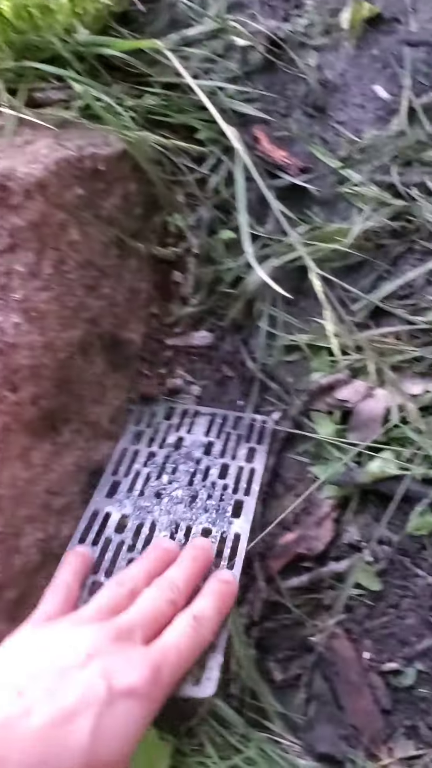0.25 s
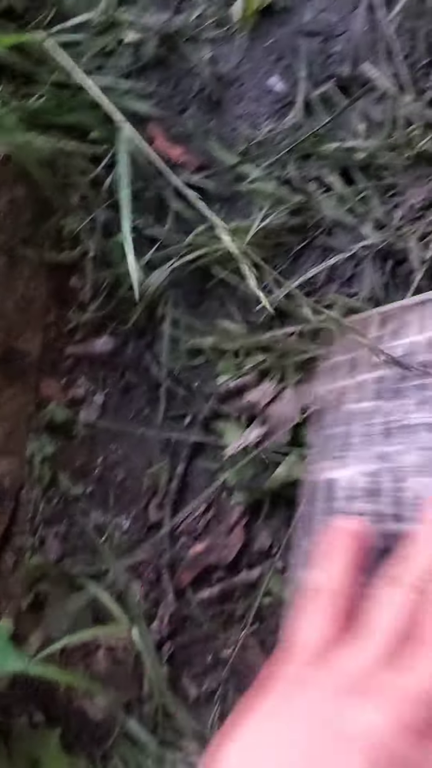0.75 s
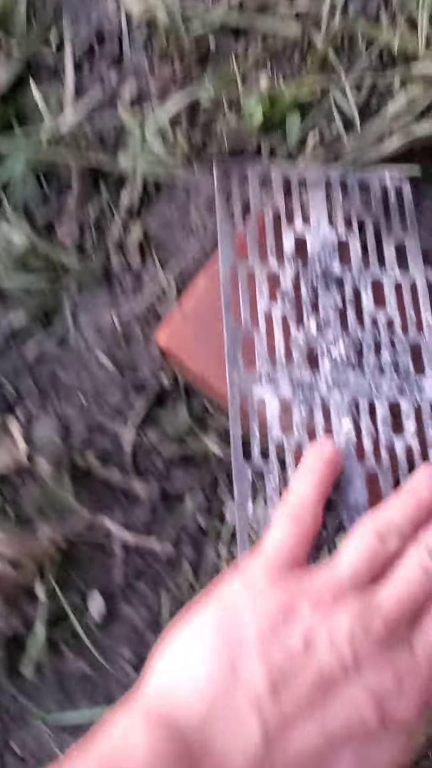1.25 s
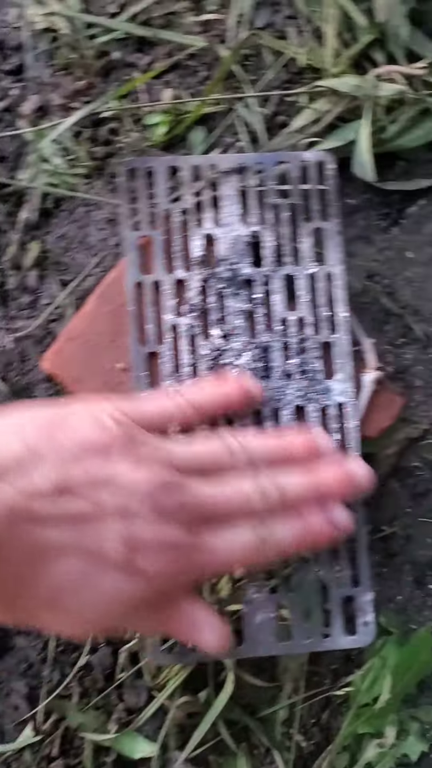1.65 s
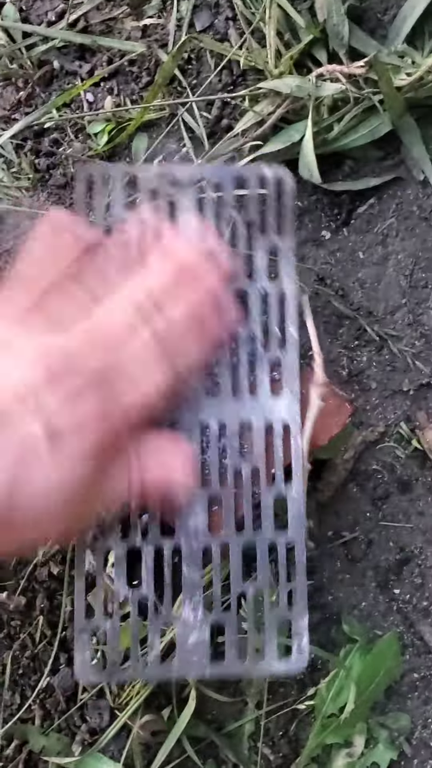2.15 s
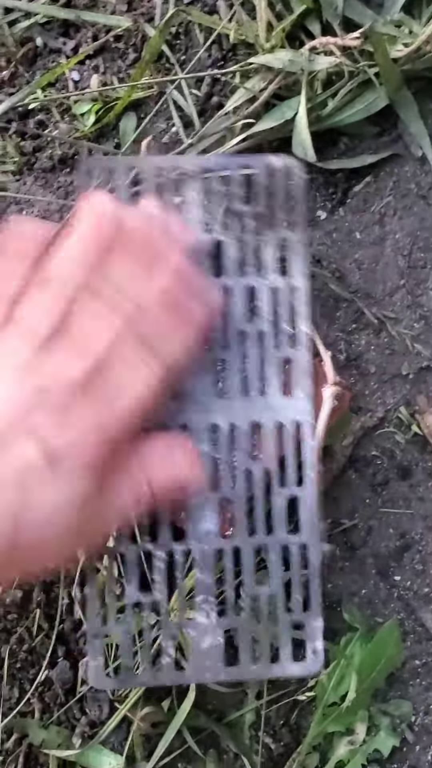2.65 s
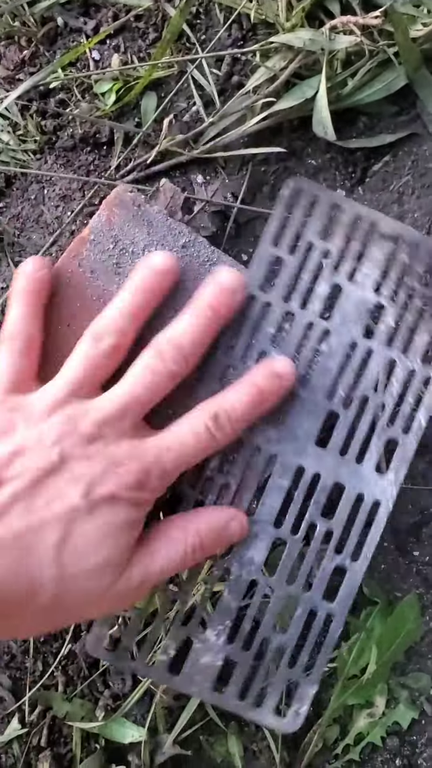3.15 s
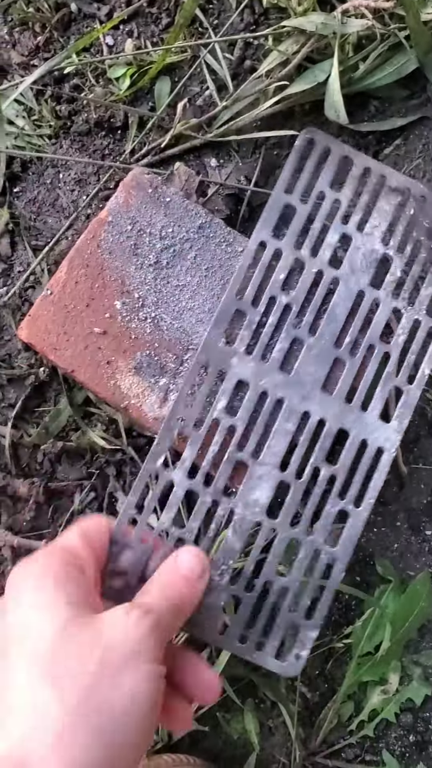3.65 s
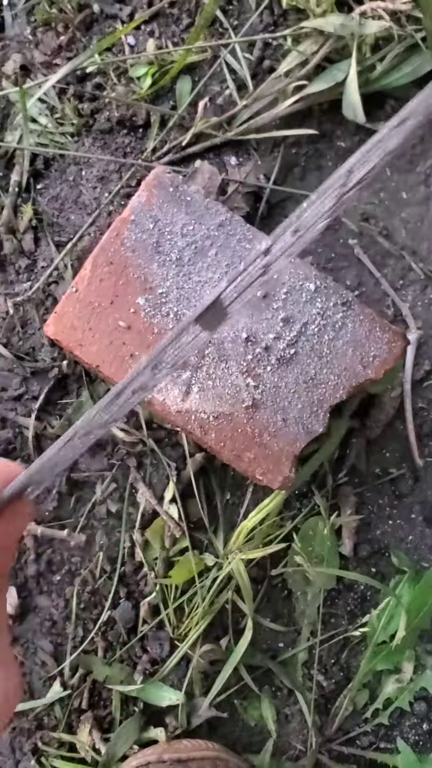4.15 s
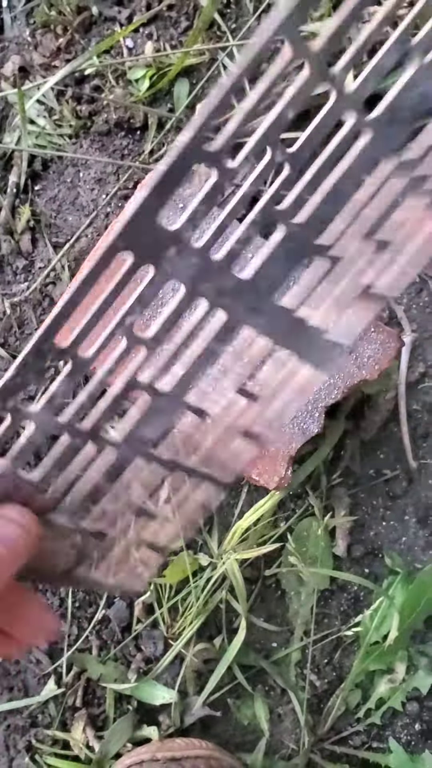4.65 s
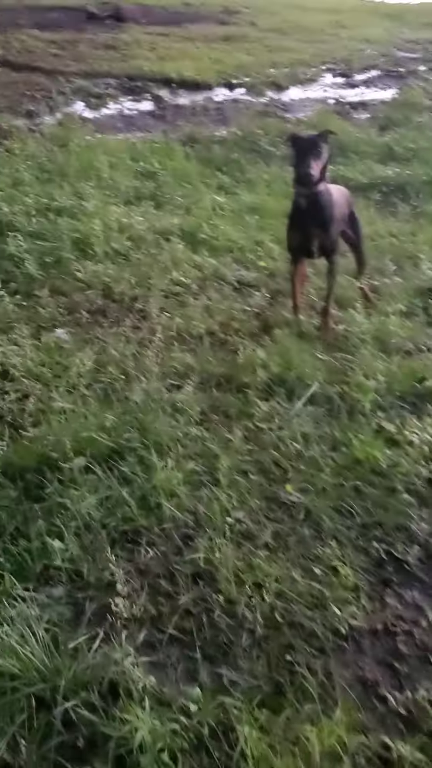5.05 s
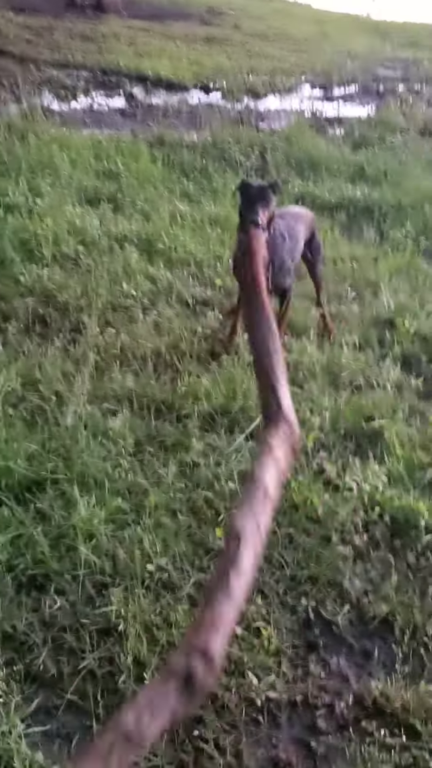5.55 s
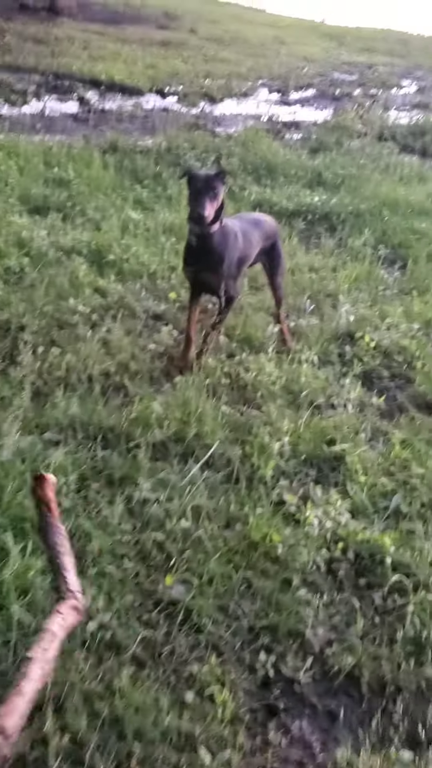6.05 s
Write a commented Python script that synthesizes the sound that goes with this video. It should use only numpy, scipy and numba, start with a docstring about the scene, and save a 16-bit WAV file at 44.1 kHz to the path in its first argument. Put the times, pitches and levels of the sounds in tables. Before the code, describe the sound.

Gritty, ringing strokes of a metal grate rubbed on brick outdoors, three knocks, a brief crackle, then soft wind on the microphone.

```python
"""Metal grate on a brick, outdoors

A slotted grate is rubbed to and fro on a brick: grit hisses and sets the metal ringing. It is lifted
and knocked three times on its edge. After a burst of crackle and a short silence there is only wind
on the microphones, rustling grass and the faint swish of a stick.
The left microphone is bright and peaky, the right one covered and muffled."""
import sys
import numpy as np
from scipy import signal
from scipy.fft import rfft, irfft, next_fast_len
from scipy.io import wavfile
from scipy.ndimage import uniform_filter1d
from numba import njit

SR = 44100
rng = np.random.default_rng(int(sys.argv[2]) if len(sys.argv) > 2 else 0)


def master(y):
    """Save y as 16-bit WAV."""
    cut = np.clip(np.atleast_2d(y).T, -1, 1)
    pcm = np.round(cut * 32767)  # scale
    wavfile.write(sys.argv[1], SR, pcm.astype(np.int16))


N = 278315
STEP = 128   # samples between updates of a mode's share of the rubbing
SILENCE_START_S, SILENCE_END_S = 4.958, 5.033
KNOCK_LAG_MS = 3.0   # the left microphone hears the edge knocks later

# The edge strikes the brick. Each row: start in seconds, knock level in dB, pitch in Hz, ring level
# in dB, ring brightness in dB per octave, knock t60 in seconds, contact in ms, left minus right in dB,
# loosened grit in dB, grit t60 in seconds.
EDGE_KNOCKS = [(4.118, -38, 1220, -42.5, 22.5, 0.025, 44, -9, -67.5, 3.4),
               (4.307, -32.5, 1223, -37.5, 6.5, 0.026, 12.4, -12, -56.5, 0.33),
               (4.480, -20.5, 1717, -24, 2.5, 0.026, 17.9, -6, -49, 0.41)]


def grate():
    """Each stroke drags the grate over brick grit; the same contacts scrape, ring and sing."""
    # Each row: start in seconds, hold in ms, grit level in dB, ms to rise 20 dB, ms to fall 20 dB,
    # body against grit in dB, treble tilt in dB.
    strokes = [(1.072, 4.5, -50, -2.5, 23, 0.5, 6), (1.127, 108, -52, 15, 96, -6.5, -4.5),
               (1.46, 35, -41.5, 148, 44, -12, -5), (1.546, 7.2, -56, 20, 79, -3.5, -5.5),
               (1.821, 40, -45.5, 151, 49, -32, -1), (1.923, 6.9, -51, 80, 78, -35, 0),
               (2.005, 9.3, -51, 64, 63, -28, 0), (2.069, 88, -45.5, 35, 45, -18.5, -0.5),
               (2.216, 49, -40, 29, 123, -21, -1), (2.419, 4.2, -42.5, 136, 82, -17, 1),
               (2.478, 5.4, -47, 55, 97, -18.5, -1.5), (2.6, 16, -47, 90, 251.5, -18.5, 1),
               (2.727, 25, -40.5, 54, 110, -18, -0.5), (2.853, 96, -50, -0.5, 58.5, -18.5, 1),
               (2.988, 57, -38.5, 20.5, 99, -14, -1.5), (3.069, 10, -32.5, 101, 45.5, -22.5, -1),
               (3.173, 5.6, -34, 90.5, 68.5, -14.5, -3), (3.346, 65.5, -41.5, 68, 152, -19.5, -4),
               (3.69, 23, -46.5, 52, 88.5, -18, -4.5)]
    grit_db, body_db, tilt_db = swells(*np.transpose(strokes))
    judder = amp(2 * drift(60)[0] + drift(220)[0])   # the grate catches and slips
    force = amp(grit_db) * judder
    contact = grains(7000, spread_db=1)
    scraping = force * scrape(contact, body_db, tilt_db)
    return scraping + grate_modes(force * contact, tilt_db) + singing(contact)


def scrape(contact, body_db, tilt_db):
    """Grit hisses, its treble flickering, over the low resonances of brick and grate."""
    # Each row: frequency in Hz, gain in dB.
    grit_spectrum = [(1500, -33.5), (2600, -11), (3500, -8), (5300, -6), (7000, -4), (10000, 1.5),
                     (13000, 1.5), (16000, -9)]
    # Each row: resonance in Hz, width in Hz, level in dB.
    body_modes = [(548, 340, -5), (859, 350, 3.5), (1066, 170, -4), (1390, 680, 3.5), (1662, 250, -2),
                  (2196, 220, -0.5)]
    grit = rms_one(microphones(colour(rasp(contact), grit_spectrum)))
    dull = signal.sosfilt(signal.butter(2, 6000, fs=SR, output="sos"), grit)
    grit = amp(-tilt_db + 2.1 * drift(20)) * dull + amp(tilt_db + 0.5 * drift(45)) * (grit - dull)
    body = sum(amp(db + 3.8 * drift(16)[0]) * narrow(contact, hz, width) for hz, width, db in body_modes)
    return grit + amp(body_db) * rms_one(microphones(body))


def rasp(contact, count=44, cycles=75):
    """A crowd of short-lived slot and bar resonances; which ones sound shifts with the contact."""
    pitches = np.geomspace(1500, 16000, count) * amp(rng.normal(0, 0.32, count))
    no_blows, no_grip = np.zeros(N), np.ones(N)
    out = 0
    for hz, spot in zip(pitches, wandering(count, rate=16)):
        out = out + hz * ring(contact, amp(6.4 * spot), no_blows, hz, cycles / hz, no_grip)
    return rms_one(out) + 0.054 * contact


def grate_modes(rubbing, tilt_db, coupling_db=-32.5):
    """The metal rings, fed by the rubbing and by the edge chattering through each blow."""
    # Mode frequencies in Hz; close pairs beat.
    mode_hz = [1700, 3210, 3760, 4600, 6190, 6495, 6630, 7020, 7564, 7660, 7905, 8200, 9075, 9220, 9385,
               9535, 9950, 10430, 10790, 11280, 11960, 12320, 12660, 13232, 13272, 13670, 13880, 14050,
               14285, 14590, 14660, 14716, 15110, 15295, 15700]
    # Each row: a mode's gain in dB when rubbed, gain in dB when knocked, free t60 in seconds.
    modes = [(-30.5, -20.5, 0.36), (-20.5, -15, 0.11), (-19, -31, 0.21), (-27.5, -24.5, 0.19),
             (-7.5, -31.5, 0.21), (-15.5, -5.5, 0.17), (-13, -26, 0.34), (-14, -32, .2), (-15.5, -15, 0.27),
             (-25.5, -22, 0.14), (-8, -24, 0.16), (-13, -10, 0.032), (-3.5, -32, 0.23), (-9.5, -32, 0.34),
             (-13, -9, 0.064), (-18, -31.5, 0.15), (-8, -35.5, 0.18), (-24, -14, 0.13),
             (-11.5, -12.5, 0.078), (-11.5, -29.5, 0.17), (-3.5, -14.5, 0.064), (-10, -30.5, 0.17),
             (-11.5, -12.5, 0.13), (-17, -20.5, 0.75), (-17, -19, 1), (-11, -10.5, 0.13),
             (-13.5, -18.5, 0.1), (-10, -17.5, 0.31), (-10, -12.5, 0.12), (-12, -18, 0.22),
             (-13, -15.5, .38), (-9.5, -12.5, .55), (-11.5, -15.5, 0.099), (-10.5, -16, .17),
             (-2.5, -13.5, .11)]
    push = amp(coupling_db) * rubbing
    damping, hits = grip(), blows()
    t = np.arange(int(.15 * SR)) / SR
    spots = wandering(len(mode_hz), rate=13)   # the contact wanders, each mode comes and goes
    chatter = rng.standard_normal((len(hits), len(t)))
    luck_db = rng.normal(0, 0.64, (len(hits), len(mode_hz)))   # each blow lands on another spot
    rings = 0
    for hz, (rubbed_db, knocked_db, t60), spot, mode_luck_db in zip(mode_hz, modes, spots, luck_db.T):
        share_db = rubbed_db + 5.1 * spot + tilt_db[::STEP] * np.log2(hz / 6000)
        strikes = np.zeros(N)
        for hit, noise, chance_db in zip(hits, chatter, mode_luck_db):
            s, _, _, ring_db, bright_db, _, contact_ms, _, lag_ms = hit
            at, contact_s = round((s + lag_ms / 1000) * SR), contact_ms / 1000
            gain = amp(ring_db + knocked_db + chance_db + bright_db * np.log2(hz / 10000))
            strikes[at:at + len(t)] += gain * noise * np.exp(-t / contact_s) / np.sqrt(contact_s * SR / 2)
        rings = rings + ring(push, amp(share_db), strikes, hz, t60, damping)
    return microphones(rings)


@njit
def ring(drive, share, strikes, hz, t60, damping):
    """One mode with a changing loss and a changing share of the drive; a unit strike rings at height 1."""
    out = np.zeros_like(drive)
    angle, free_decay = 2 * np.pi * hz / SR, 10 ** (-3 / (t60 * SR))
    turn, gain = 2 * np.cos(angle), np.sin(angle)
    for side in range(drive.shape[0]):
        for n in range(2, drive.shape[1]):
            decay = free_decay * damping[n]
            push = share[n // STEP] * drive[side, n] + strikes[n]
            out[side, n] = decay * turn * out[side, n - 1] - decay ** 2 * out[side, n - 2] + gain * push
    return out


def grip(touch_db_per_s=445, touch_s=.015):
    """Share of the ring left each sample: the hand damps it, and the later edge knocks choke it."""
    # Each row: time in seconds, loss in dB per second.
    hand_loss = [(2.9, 400), (3.25, 250), (3.45, 70), (3.63, 62), (3.64, 900), (3.67, 253), (4.1, 213),
                 (4.13, 15)]
    t = np.arange(N) / SR
    touch = sum(np.maximum(1 - abs(t - s) / touch_s, 0) for s, *_ in EDGE_KNOCKS[1:])
    loss = np.interp(t, *np.transpose(hand_loss)) + touch_db_per_s * touch
    return amp(-loss / SR)


def singing(contact):
    """The loosely held grate sings in a low mode, toward the left."""
    # Each row: start in seconds, pitch in Hz, hold in ms, level in dB, ms to rise 20 dB, ms to fall 20 dB.
    notes = [(3.4, 3680, 65, -54.5, 99.5, 170), (4.2, 3697, 100, -62.5, 30, 179.5),
             (4.5, 1730, 20, -74.5, 10, 500.5)]
    out = 0
    for s, hz, *shape in notes:
        tone = rms_one(narrow(contact, hz, width_hz=140) * sides(8.1)[:, None])
        out = out + amp(swells(s, *shape)[0]) * tone
    return out


def blows():
    """Catches of the rubbed grate, then edge knocks: eight columns as in EDGE_KNOCKS and a lag in ms."""
    # Each row: start in seconds, knock level in dB, pitch in Hz, ring level in dB,
    # ring brightness in dB per octave.
    catches = [(1.074, -48.5, 2280, -43, -2), (1.125, -55, 1810, -61, 7), (1.467, -47.5, 830, -55, 0),
               (1.544, -52, 830, -43, -2), (2.043, -56, 865, -48, -2), (2.068, -70, 1550, -30, 9),
               (2.214, -54, 850, -36, 2), (2.415, -52, 800, -34, 9), (2.726, -58, 860, -35, 12),
               (2.852, -63, 1680, -31.5, 7), (2.984, -65, 1640, -45, 10), (3.074, -50, 1740, -34, -5)]
    t60, contact_ms, pan_db, lag_ms = 0.027, 2.7, 9, 0.28
    return ([(*row, t60, contact_ms, pan_db, lag_ms) for row in catches]
            + [(*row[:8], KNOCK_LAG_MS) for row in EDGE_KNOCKS])


def knocks():
    """The dull knock of each blow on the brick; each edge knock bounces once, higher in pitch."""
    bounce_ms, bounce_db, bounce_pitch = (7.3, 7, 3), (-10.5, -2, -9.5), 1.4
    out = np.zeros((2, N))
    for s, level_db, hz, _, _, t60, _, pan_db, lag_ms in blows():
        add_knock(out, s, level_db, hz, t60, pan_db, lag_ms, rough=0.94)
    for (s, level_db, hz, _, _, t60, _, pan_db, *_), ms, db in zip(EDGE_KNOCKS, bounce_ms, bounce_db):
        add_knock(out, s + ms / 1000, level_db + db, hz * bounce_pitch, t60, pan_db, KNOCK_LAG_MS, rough=1.37)
    return out


def add_knock(out, s, level_db, hz, t60, pan_db, lag_ms, rough):
    """One impact: a dying tone with two lower partners, roughened by noise; the left side lags."""
    t = np.arange(int(.2 * SR)) / SR
    noise = narrow(rng.standard_normal((3, len(t))), 0.87 * hz, 0.64 * hz)
    noise = (noise[:2] + 0.43 * noise[2]) / noise.std()
    phase = 2 * np.pi * hz * t
    tone = np.sin(phase) + 0.25 * np.sin(0.62 * phase) + 0.058 * np.sin(0.8 * phase)
    knock = (tone + rough * noise) * amp(level_db - 60 * t / t60)
    for side, lag_s, piece in zip(out, (lag_ms / 1000, 0), knock * sides(pan_db)[:, None]):
        at = round((s + lag_s) * SR)
        side[at:at + len(t)] += piece[:N - at]


def trickle():
    """Grit loosened by each edge knock trickles off the brick."""
    # Each row: frequency in Hz, gain in dB.
    spectrum = [(250, -45), (700, -18.5), (1300, -5.5), (1750, -4.5), (2200, -8.5), (2800, 0.5), (3300, 0),
                (3900, -11.5), (4600, -6.5), (6500, -12), (9000, -22), (14000, -43.5)]
    envelope, t = np.zeros(N), np.arange(SR) / SR
    for s, *_, grit_db, grit_t60 in EDGE_KNOCKS:
        envelope[round(s * SR):][:SR] = amp(grit_db - 60 * t / grit_t60)
    falling = colour(grains(3500, spread_db=-2), spectrum)
    return envelope * rms_one(microphones(falling))


def crackle():
    """A short, dense burst of crackle with a few ringing peaks; it breaks off."""
    # Each row: time in seconds, level in dB, left minus right in dB.
    envelope = [(4.916, -78.5, -12.5), (4.921, -26, -25), (4.927, -25.5, -16), (4.935, -26.5, -10),
                (4.945, -35, -4), (4.957, -42.5, 3), (4.959, -56, -25.5), (4.976, -78.5, -18.5)]
    # Each row: frequency in Hz, gain in dB.
    spectrum = [(150, -18.5), (400, -15), (1000, -7), (2500, -4), (4500, -0.5), (7000, 2.5), (11000, 2),
                (16000, -2.5)]
    # Each row: resonance in Hz, width in Hz, gain in dB.
    peaks = [(410, 20.6, 13), (1173, 42, 13.5), (1850, 62, 2.5), (2850, 58, 5.5), (4730, 200, 7),
             (6220, 130, 5), (7850, 154, 10), (12100, 204.3, 5.5)]
    level_db, pan_db = in_time(envelope)
    crackling = colour(grains(9000, spread_db=3.5), spectrum)
    ringing = sum(amp(db) * resonance(crackling, hz, width) for hz, width, db in peaks)
    return amp(level_db) * sides(pan_db) * rms_one(microphones(crackling + ringing))


def ticks():
    """Twigs and handling make small, scattered impacts."""
    # Each row: start in seconds, level in dB, pitch in Hz, t60 in seconds, left minus right in dB.
    impacts = [(0.023, -41.5, 3980, 0.006, 13), (0.024, -44, 302, 0.046, -14),
               (0.043, -36, 620, 0.015, -18.5), (0.329, -62.5, 1190, 0.01, 7),
               (0.651, -53, 5900, 0.0047, 19), (0.952, -72, 4400, 0.01, 12),
               (4.485, -37, 62.3, 0.34, -13.5), (5.572, -61.5, 594, 0.04, 5), (5.802, -49.5, 241, 0.094, 7),
               (5.906, -59.5, 1170, 0.0079, 12), (5.801, -71, 5190, 0.032, 22),
               (5.84, -76, 2280, 0.0084, 5), (6.252, -53.5, 750, 0.0065, -17.5),
               (6.269, -73.5, 1365, 0.58, 2)]
    out = np.zeros((2, N))
    for impact in impacts:
        add_knock(out, *impact, lag_ms=0, rough=0.71)
    return out


def rustle():
    """Brushed grass and clothes: fine grains with a duller swish below."""
    # Each row: time in seconds, level in dB, ms to rise 20 dB, ms to fall 20 dB, swish against level in dB.
    brushes = [(.022, -71, 13, 21, 8), (.05, -73.5, 46, 100, 7), (.09, -76, 200, 300, -5),
               (.224, -69, 200, 300, -13.5), (.324, -68, 148, 202, -19), (.6, -66, 252, 204, -16),
               (0.65, -44, -1, 3, -35), (.75, -75.5, 300, 500, -6.5), (.955, -72, 32, 200, -11),
               (3.85, -75.5, 101, 200, -13), (3.97, -67, 147, 176, -18.5), (4.68, -76, 150, 200.5, -11.5),
               (5.041, -82.5, 21, 150, 3), (5.525, -64, 34, 64, -9), (5.63, -72, 297, 200, -8.5),
               (5.801, -62, 17, 89, -8), (5.88, -68.5, 200, 150, -5.5), (6.079, -79.5, 63, 180, 2.5),
               (6.253, -80, 3, 13, 8.5), (6.31, -84, 57, 100, 4)]
    # Each row: frequency in Hz, gain in dB.
    spectrum = [(1500, -21), (2500, -13), (4000, -2.5), (6000, -4.5), (9000, -2.5), (12000, -2),
                (16000, -3)]
    s, *shape = np.transpose(brushes)
    level_db, swish_db = swells(s, 0, *shape)
    brushed = grains(5800, spread_db=0)
    fine = rms_one(microphones(colour(brushed, spectrum)))
    swish = rms_one(resonance(brushed, 670, 1960) * sides(8.3)[:, None])
    return amp(level_db + 2.6 * drift(37)) * (fine + amp(swish_db) * swish)


def stick():
    """Air whirls round a swung stick on the right: a soft band of noise."""
    whirl = narrow(rng.standard_normal((2, N)), 2200, 600)
    level_db = swells(6.17, held_ms=0, db=-84, rise_ms=251, fall_ms=70)[0]
    return amp(level_db) * rms_one(whirl * sides(-8.5)[:, None])


def wind():
    """Lumpy low turbulence on the two microphone ports, partly shared between them."""
    # Each row: frequency in Hz, gain in dB.
    spectrum = [(12, -35), (20, -13.5), (58, 5.5), (85, 3), (290, -25.5), (604, -45.5), (900, -50),
                (1170, -74.5), (1980, -120)]
    level_db, pan_db = wind_strength()
    own, shared = rng.standard_normal((2, N)), rng.standard_normal(N)
    flow = rms_one(colour(own + 0.96 * shared, spectrum) * amp(2.6 * drift(15)))
    flutter = signal.sosfilt(signal.butter(2, 170, "high", fs=SR, output="sos"), flow)
    breeze_db, missed_swing = -47.5, 0.66   # the flutter follows only part of a gust's swing
    flutter_db = np.minimum(3.5 - missed_swing * (level_db - breeze_db), 12)
    flutter_db -= 3.5 * (np.arange(N) / SR > SILENCE_END_S)   # less flutter after the silence
    balance = sides(pan_db)
    balance /= np.sqrt(np.mean(balance ** 2, axis=0))
    return amp(level_db) * (flow + (amp(flutter_db) - 1) * flutter) * balance


def wind_strength():
    """Level and side in dB of the breeze with gusts on top, both wavering by chance."""
    # A span each side of the silence. Each row: time in seconds, level in dB, left minus right in dB.
    breeze = [
        [(0, -53.5, 1), (.7, -50, 1), (1.4, -49.5, 1), (1.8, -50, 3), (2.2, -41.5, -4), (2.6, -44, -1.5),
         (3.0, -48, 1), (3.4, -42, 2), (3.75, -48.5, -8), (4.3, -45.5, -6), (4.6, -49, -11),
         (4.96, -54.5, -26.5)],
        [(5.03, -54.5, 0.5), (5.4, -52.5, -1.5), (5.7, -57, 0), (6.0, -56.5, 0.5), (6.31, -51.5, -5)],
    ]
    # Each row: start in seconds, hold in ms, level in dB, left minus right in dB.
    gusts = [(.03, 6.8, -46, -13), (.16, 20, -49, -4), (1.45, 8.9, -42, -7), (1.97, 6.6, -48, -21),
             (2.071, 10, -34.5, -12), (2.31, 78, -33, -11.5), (2.46, 17, -35.5, -15), (2.71, 16, -39.5, -7),
             (3.15, 105, -43.5, 11), (3.52, 23, -40.5, 3), (4.24, 9, -42, -9), (4.49, 28, -37.5, -22),
             (5.53, 10, -49.5, 1), (6.13, 10, -51, -5)]
    rise_ms, fall_ms = 80, 100
    steady_db, steady_pan = in_time(*breeze)
    s, held_ms, db, pan = np.transpose(gusts)
    gust_db, gust_pan = swells(s, held_ms, db, rise_ms, fall_ms, pan)
    power = amp(2 * steady_db) + amp(2 * gust_db)
    gust_share = amp(2 * gust_db) / power
    lump, sway = drift(14)
    return 10 * np.log10(power) - 0.5 * lump, steady_pan + gust_share * (gust_pan - steady_pan) + 4 * sway


def hiss():
    """Faint, steady air and circuit noise on each side."""
    # Each row: frequency in Hz, left and right density in dB per Hz (left ahead of the port's peaks).
    spectrum = [(200, -100, -100), (512, -113, -115), (1004, -118, -119), (2493, -120, -121),
                (4500, -122, -128), (8100, -124, -136), (12200, -128, -134), (16000, -126, -134)]
    white = rng.standard_normal((2, N)) * np.sqrt(SR / 2)
    left = microphones(colour(white, spectrum))[0]
    return np.array([left, colour(white[1], spectrum, column=2)])


def microphones(x):
    """The left microphone's port adds resonances; the right one is covered."""
    # Each row: resonance in Hz, width in Hz, lift in dB.
    port_peaks = [(4124, 1000, 2.5), (7940, 500, 4), (8730, 1500, 4.5), (15380, 1500, 5)]
    # Each row: frequency in Hz, gain in dB.
    cover = [(300, -2.5), (700, -12.5), (1300, -10), (2400, -6), (3600, -10.5), (5300, -18), (8000, -35),
             (11000, -20.5), (16000, -22.5)]
    left = x[0]
    for hz, width_hz, db in port_peaks:
        left = left + (amp(db) - 1) * resonance(left, hz, width_hz)
    return np.array([left, colour(x[1], cover)])


def amp(db):
    """Gain of a level in dB."""
    return 10 ** (np.asarray(db) / 20)


def sides(pan_db):
    """Left and right gains, pan_db apart."""
    return amp(np.array([pan_db / 2, -pan_db / 2]))


def rms_one(x):
    """Scaled so that the mean of the channels has rms 1."""
    return x / np.sqrt(np.mean(np.mean(x, axis=0) ** 2) + 1e-20)


def in_time(*spans):
    """Level and side in dB at every sample; silent outside the spans."""
    t = np.arange(N) / SR
    s, level_db, pan_db = np.transpose(np.concatenate(spans))
    inside = sum((t >= rows[0][0]) & (t <= rows[-1][0]) for rows in spans)
    return np.where(inside, np.interp(t, s, level_db), -200), np.interp(t, s, pan_db)


def swells(s, held_ms, db, rise_ms, fall_ms, *columns):
    """Level in dB of overlapping rise-hold-fall events; further columns follow the loudest."""
    ms = np.arange(N / SR * 1000 + 2)
    after = ms[:, None] - 1000 * s
    rising = np.maximum(-after, 0) / np.maximum(rise_ms, 1)
    falling = np.maximum(after - held_ms, 0) / np.maximum(fall_ms, 1)
    power = amp(2 * np.maximum(db - 20 * (rising + falling), -200))
    total = power.sum(axis=1)
    curves = [10 * np.log10(total)] + [power @ column / total for column in columns]
    return [np.interp(np.arange(N) / SR * 1000, ms, curve) for curve in curves]


def colour(x, points, column=1):
    """Filter by a smooth spectrum in dB."""
    size, points = next_fast_len(N + 4096), np.array(points)
    hz = np.maximum(np.arange(size // 2 + 1) * SR / size, 1)
    gain_db = np.interp(np.log(hz), np.log(points[:, 0]), points[:, column])
    return irfft(rfft(x, size) * amp(gain_db), size)[..., :N]


def resonance(x, hz, width_hz):
    """Band-pass of gain 1 at its top."""
    r = np.exp(-np.pi * width_hz / SR)
    feedback = [1, -2 * r * np.cos(2 * np.pi * hz / SR), r * r]
    return signal.lfilter((1 - r * r) / 2 * np.array([1, 0, -1]), feedback, x)


def narrow(x, hz, width_hz):
    """A resonance applied twice: steep flanks."""
    return resonance(resonance(x, hz, width_hz), hz, width_hz)


def grains(per_s, spread_db):
    """Random contacts, separate on each side, their sizes scattered by spread_db."""
    born = rng.random((2, N)) < per_s / SR
    sizes = amp(spread_db * np.minimum(rng.exponential(1, (2, N)), 5))
    return rms_one(born * sizes * rng.choice([-1, 1], (2, N)))


def drift(rate):
    """A random curve for each side, turning rate times a second."""
    return wandering(2, rate, step=1)


def wandering(count, rate, step=STEP):
    """Random curves turning rate times a second, one value every step samples."""
    knots = rng.standard_normal((count, int(N / SR * rate) + 2))
    position = np.arange(0, N, step) / SR * rate
    return np.array([np.interp(position, np.arange(len(k)), k) for k in knots])


def scene():
    """The grate ends at the silence, which only the crackle's tail enters; the background returns."""
    t = np.arange(N) / SR
    before = uniform_filter1d(1. * (t < SILENCE_START_S), size=80)
    after = uniform_filter1d(1. * (t > SILENCE_END_S), size=80)
    metal = grate()
    rest = knocks() + ticks() + trickle() + rustle() + stick() + wind() + hiss()
    return before * metal + (before + after) * rest + crackle()


def record(dry):
    """The treble steps down near 16 kHz, then is cut steeply."""
    stepped = signal.sosfilt(signal.cheby2(12, 30, 16050, fs=SR, output="sos"), dry)
    return signal.sosfilt(signal.cheby2(14, 60, 16640, fs=SR, output="sos"), stepped)


dry = scene()
out = record(dry)
master(out)
```